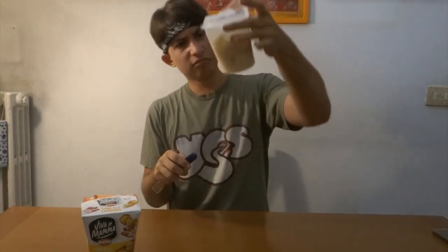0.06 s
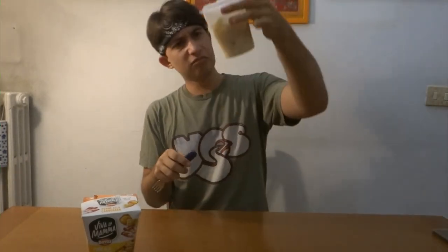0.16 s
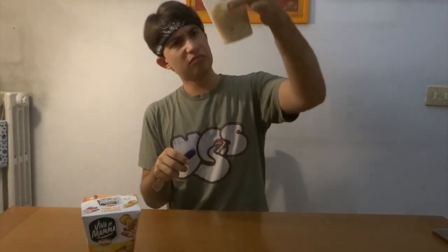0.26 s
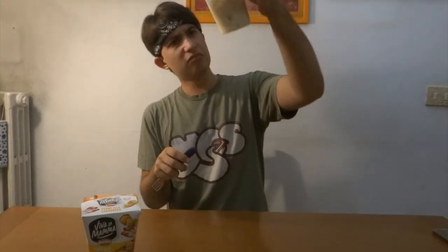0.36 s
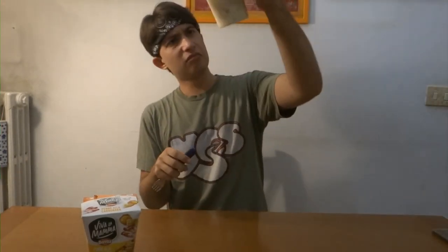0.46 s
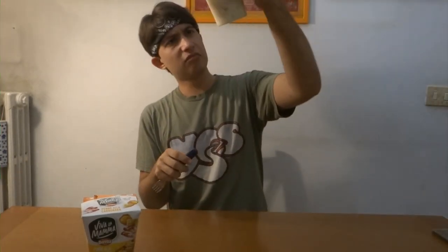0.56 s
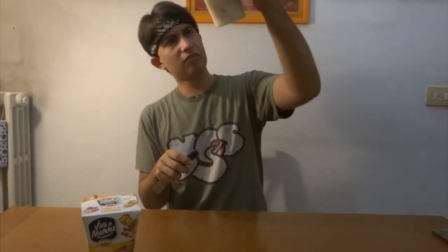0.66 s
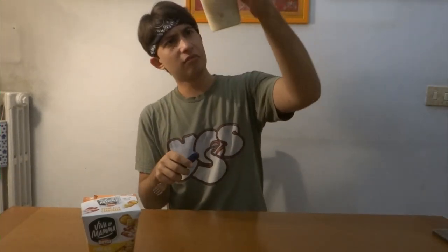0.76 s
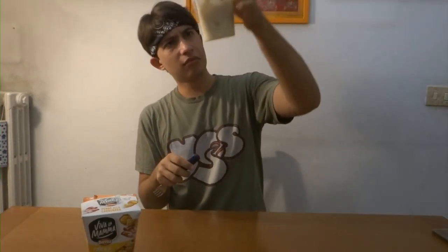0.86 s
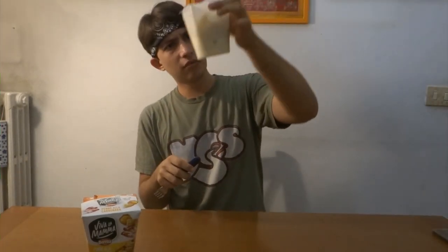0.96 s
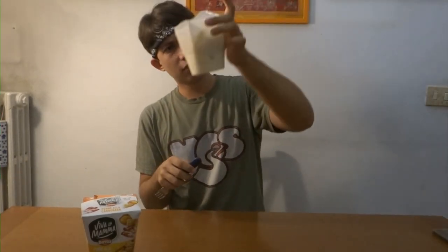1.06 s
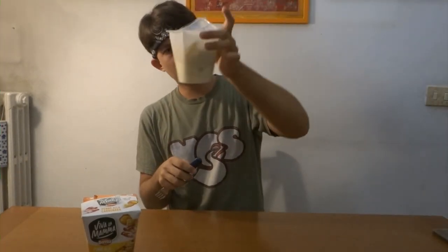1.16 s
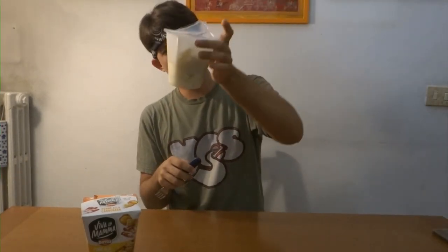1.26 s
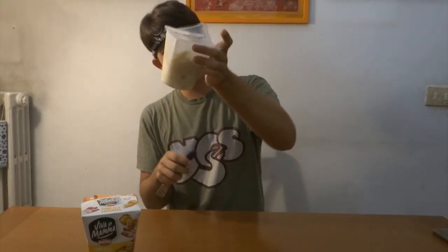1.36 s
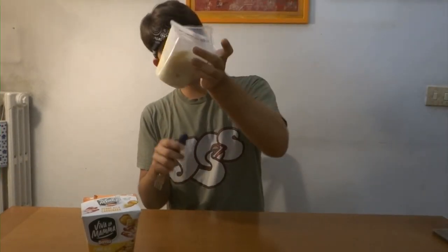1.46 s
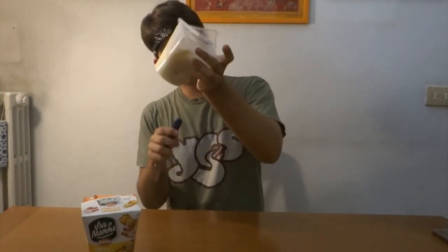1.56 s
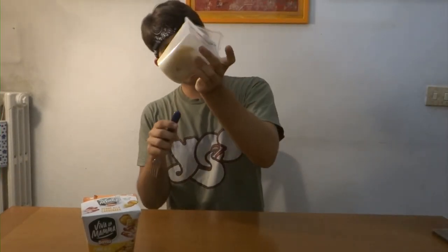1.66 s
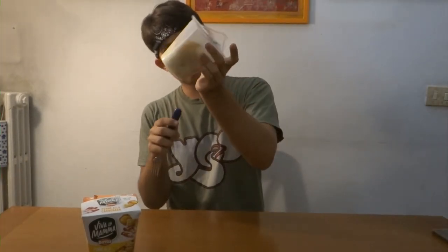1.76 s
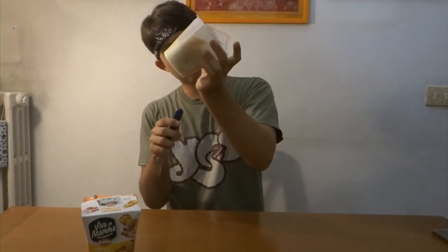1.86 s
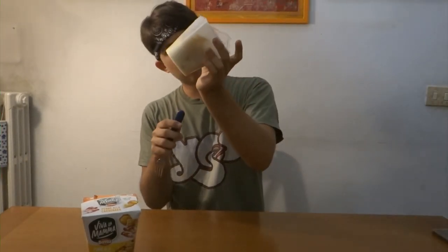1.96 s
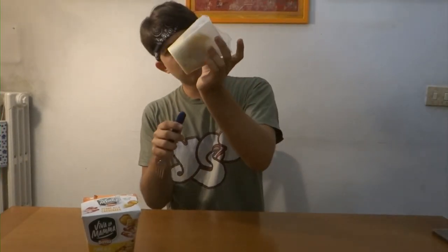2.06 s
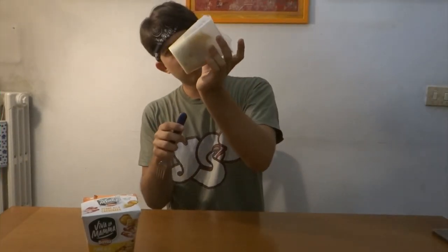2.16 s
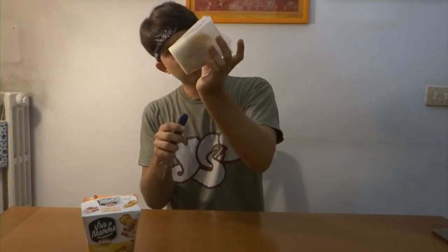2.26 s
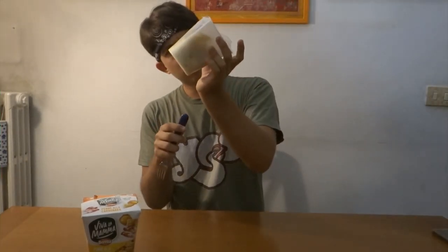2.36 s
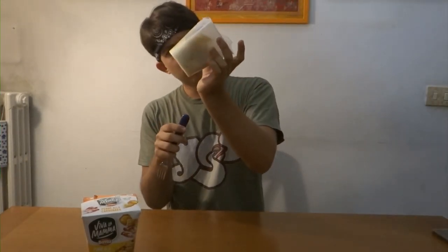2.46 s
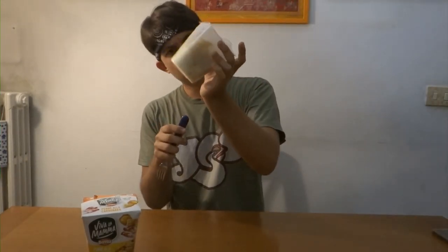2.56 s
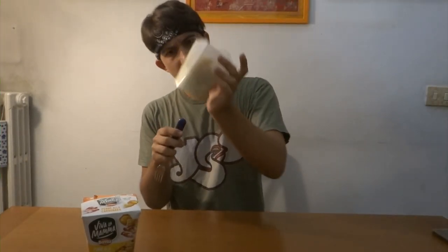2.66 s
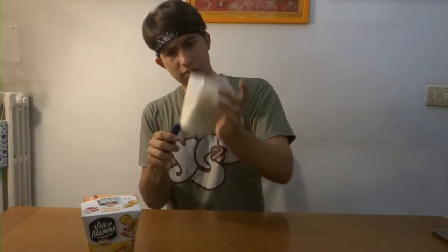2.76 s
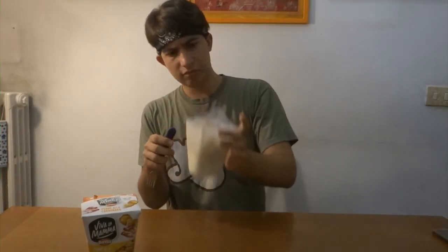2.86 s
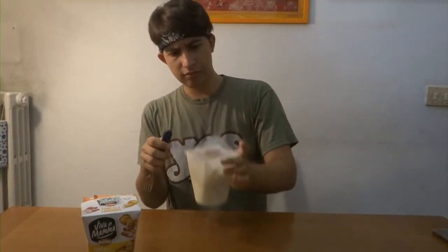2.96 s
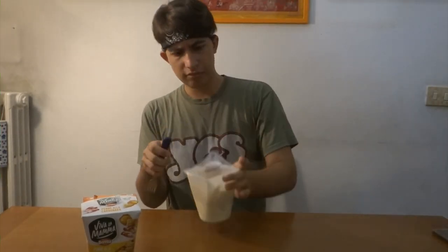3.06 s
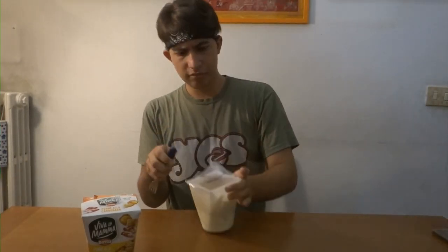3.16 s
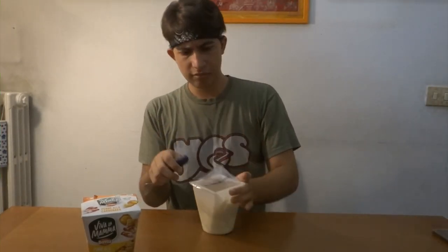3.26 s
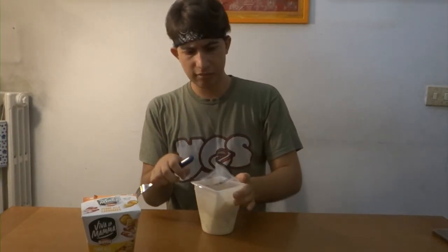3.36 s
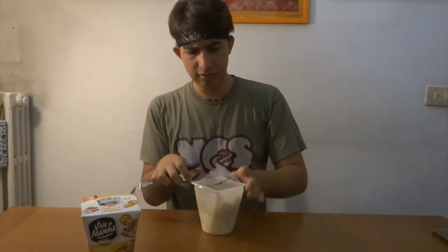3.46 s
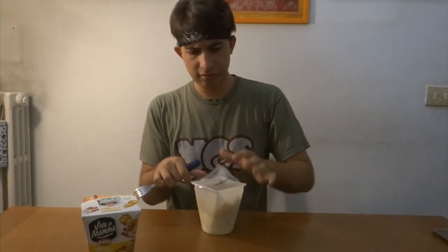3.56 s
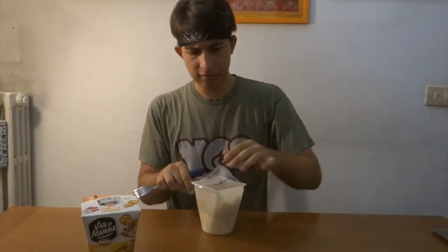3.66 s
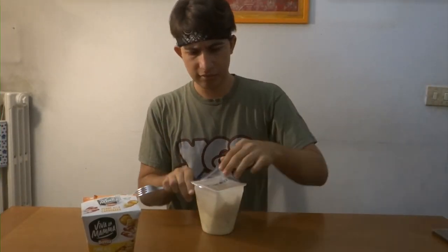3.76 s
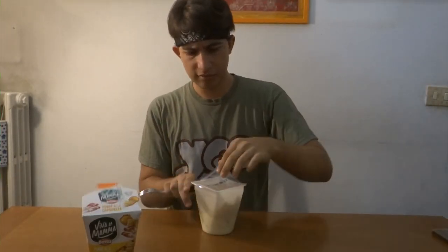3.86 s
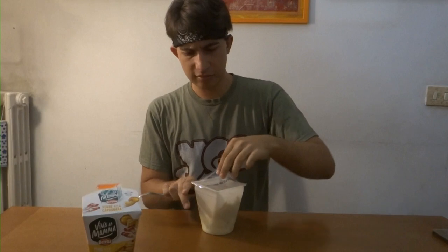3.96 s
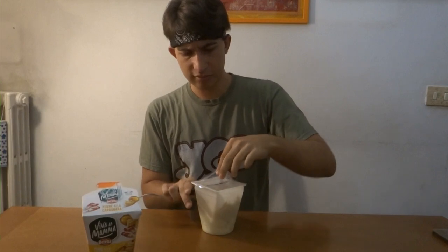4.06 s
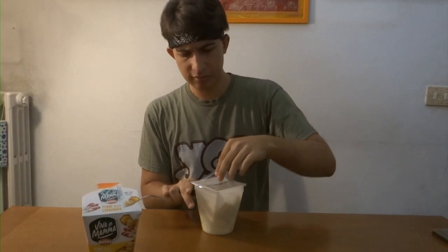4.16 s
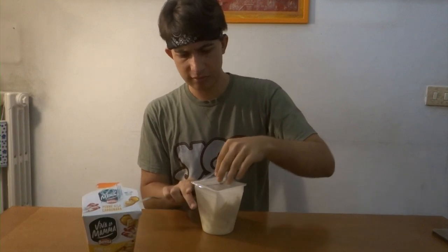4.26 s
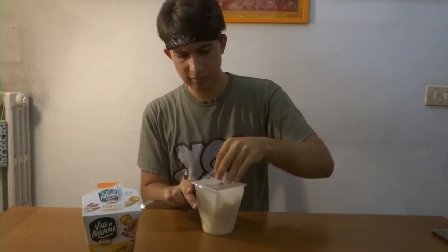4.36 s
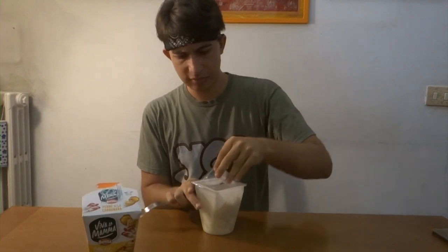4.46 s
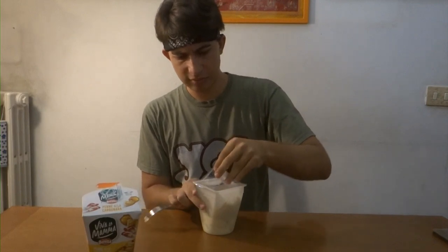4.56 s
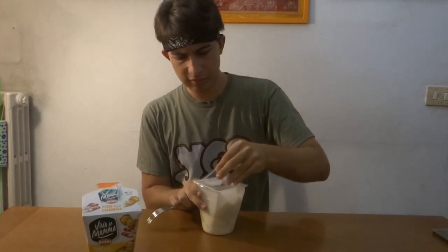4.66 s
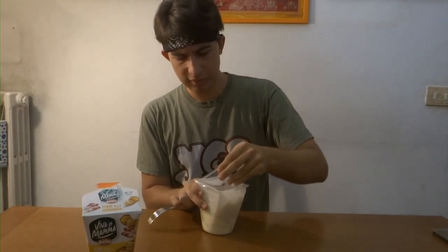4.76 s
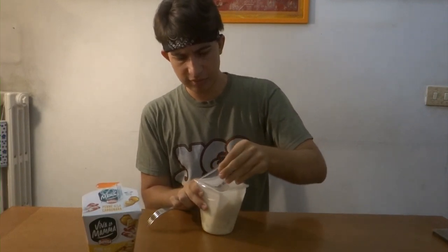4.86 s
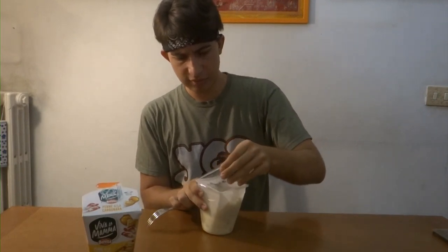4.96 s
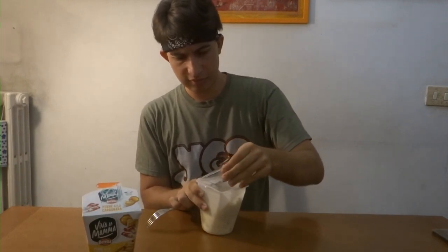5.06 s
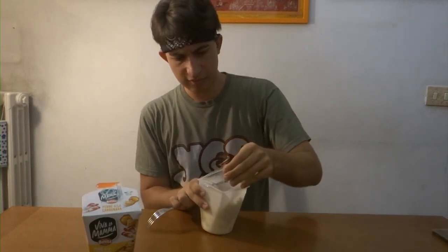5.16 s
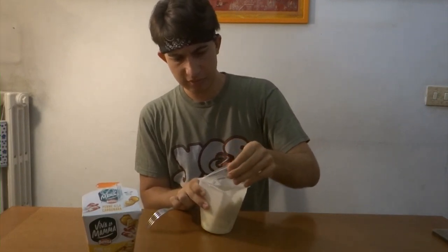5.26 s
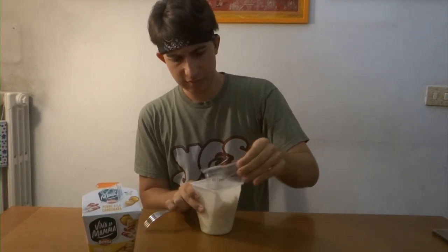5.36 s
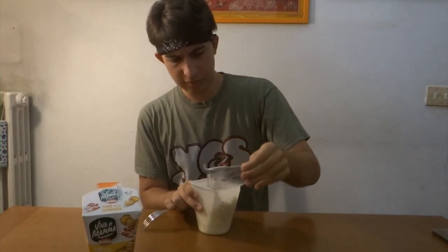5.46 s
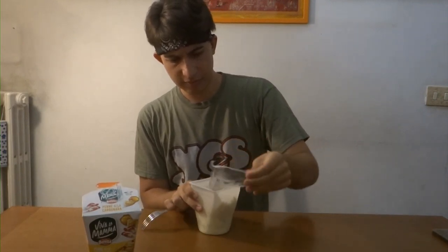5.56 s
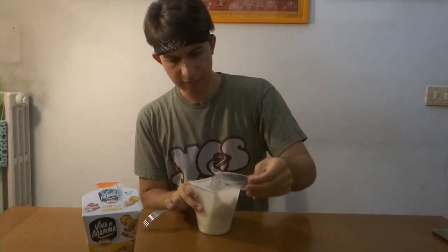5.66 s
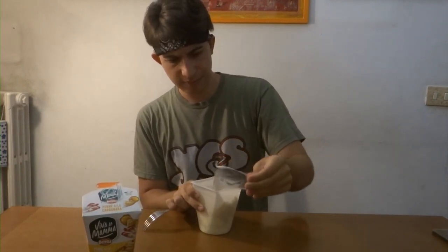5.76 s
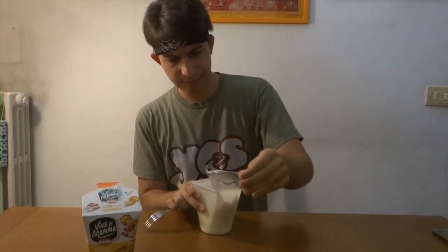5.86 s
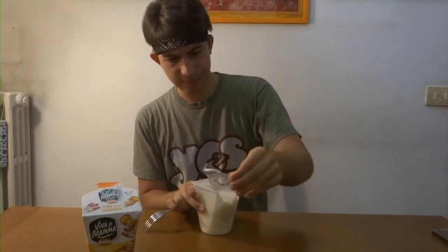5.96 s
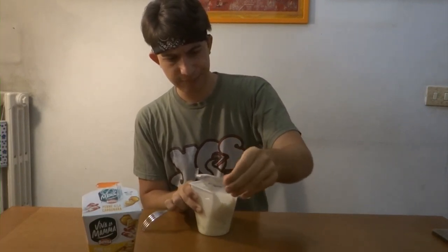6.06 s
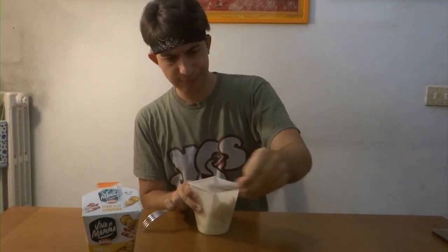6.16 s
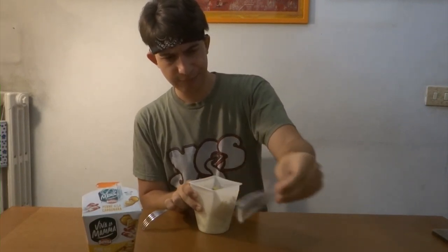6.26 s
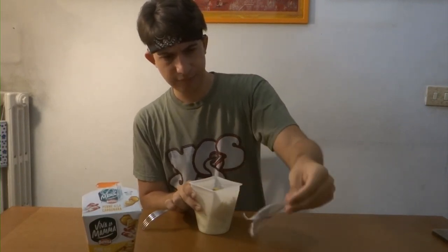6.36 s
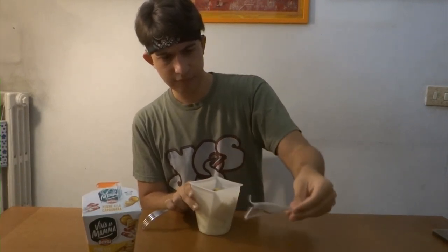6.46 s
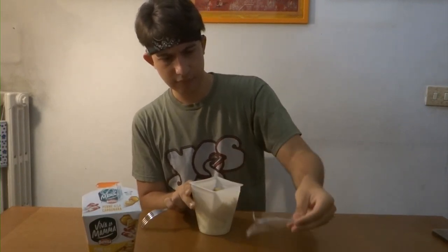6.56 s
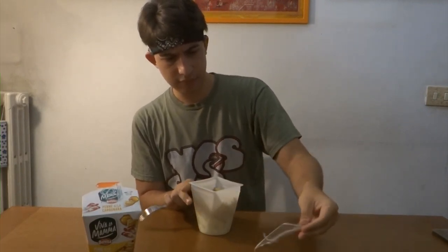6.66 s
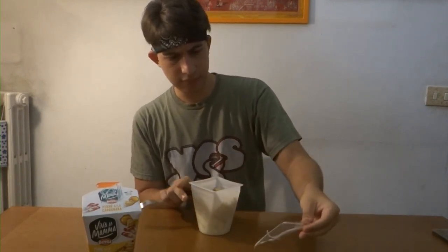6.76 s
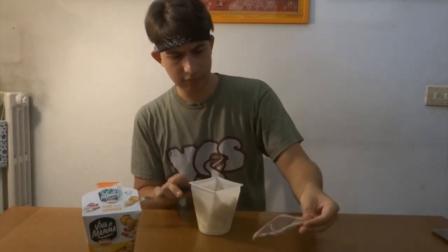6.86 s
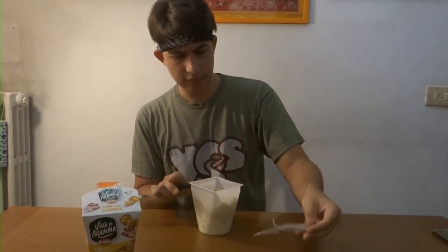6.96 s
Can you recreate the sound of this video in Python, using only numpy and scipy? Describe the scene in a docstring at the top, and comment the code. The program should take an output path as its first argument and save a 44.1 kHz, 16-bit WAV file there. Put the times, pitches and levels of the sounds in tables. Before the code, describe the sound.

Fingers brush and tap a plastic cup, it thumps onto a wooden table, then its film lid is picked and peeled off with loud, sharp crackles.

```python
"""Fingers brush and tap a plastic food cup as it is turned, over a low hum in a small bare room.
The cup is set down on a wooden table, then its film lid is picked at, peeled off and laid aside.
The seal lets go in streams of tiny random fractures; the film buckles in sharp, short noise bursts.
Both ring the cup wall and the fractures drum the taut lid, each through a filter of its own colour.
Sliding skin is finer grain noise, the landing a set of decaying sines; echoes and a tail add the room."""
import sys
import numpy as np
from scipy import signal
from scipy.fft import rfft, irfft
from scipy.io import wavfile
from scipy.ndimage import uniform_filter1d

SR = 44100
rng = np.random.default_rng(int(sys.argv[2]) if len(sys.argv) > 2 else 0)


def log_audio(samples):
    """Write samples as a 16-bit WAV file to the path given in sys.argv[1]."""
    # one column per channel
    frames = np.atleast_2d(samples).T
    # limit to full scale, then quantise
    limited = np.clip(frames, -1, 1)
    pcm = np.round(limited * 32767).astype(np.int16)
    wavfile.write(sys.argv[1], SR, pcm)


N = 308712
TIME = np.arange(N) / SR

# resonance of the cup wall: (frequency [Hz], relative gain [dB])
CUP_WALL_COLOUR = [(60, -35), (250, -14.5), (560, -5.5), (720, 2), (830, 8), (1000, 0.5), (1250, -2),
                   (1600, -16.5), (3000, -63)]
# drumming of the taut lid: (frequency [Hz], relative gain [dB])
LID_COLOUR = [(60, -60), (150, -11), (210, -10), (270, 0), (350, 3), (430, 2), (560, -7), (800, -31),
              (2000, -42)]
# midrange of skin and cloth rubbing: (frequency [Hz], relative gain [dB])
RUB_MID_COLOUR = [(200, -41), (900, -2.5), (1500, 1.5), (2400, 2.5), (3500, -2.5), (4500, -7.5), (7000, -6),
                  (16000, -67)]
# hiss of skin and cloth rubbing: (frequency [Hz], relative gain [dB])
RUB_HISS_COLOUR = [(1500, -21), (4300, 0.5), (5500, -4.5), (7500, -3), (9300, -0.5), (11000, -10.5),
                   (13000, -22), (15500, -17)]
# the hand keeps the film taut between pulls: (from [s], to [s])
TAUT_SPAN = (3.9, 6.1)
# a fingernail works at the corner and scratches the rim: (from [s], to [s])
PICKING_SPAN = (4.1, 5.15)


def peel(attack_share=0.33, release_s=0.012, taut_crackle_db=-55, taut_bright_db=3, taut_lid_db=-58.5,
         picking_db=-49.5, uneven_db=3, slip_rate_hz=22, wall_spread_db=4.0):
    """The seal gives way in a stream of fractures that tug at the film, the cup wall and the taut lid."""
    # each pull tears a stretch of the seal: (start [s], length [s], crackle level [dB],
    # treble over midrange [dB], cup wall level [dB], lid drumming level [dB])
    pulls = [(3.832, 0.051, -45, 15, -56, -46), (3.918, 0.036, -49.5, 11, -40, -57),
             (4.099, 0.033, -45.5, -21, -41.5, -63), (4.218, 0.058, -42.5, -6, -45, -69),
             (4.595, 0.044, -39.5, 10, -43.5, -71), (4.68, 0.061, -50.5, 3, -50, -51),
             (4.825, 0.039, -31, 40, -38, -40.5), (4.928, 0.051, -32, -3, -37, -40.5),
             (4.972, 0.049, -33, 9, -34.5, -45.5), (5.085, 0.12, -37, 5, -48, -49.5),
             (5.277, 0.058, -32, 7, -32, -34.5), (5.308, 0.061, -25.5, 6, -31, -28.5),
             (5.36, .055, -21, 1, -29.5, -36.5), (5.746, 0.032, -28.5, 6.5, -48, -41.5),
             (5.779, 0.046, -29.5, 8.5, -40, -36), (6.106, 0.037, -38, -7, -55, -42),
             (6.18, .04, -33.5, 11, -42.5, -42)]
    start, length, level, bright, wall, lid = np.transpose(pulls)
    db, treble_db, wall_db, lid_db = gestures(
        start, length, attack_share, release_s, level, level + bright, wall, lid)
    film, fractures, density = crackle(db, treble_db - db)

    # between pulls the taut film creaks and drums faintly
    taut = during(TAUT_SPAN)
    creak = taut * crackle(taut_crackle_db, taut_bright_db, rate=800, least_rate=120)[0]

    # the nail catches and slips on the rim
    nail = undb(picking_db + uneven_db * walk(slip_rate_hz)) * during(PICKING_SPAN)

    # levels add by power
    wall_push = np.hypot(undb(wall_db), nail)
    lid_push = np.hypot(undb(lid_db), undb(taut_lid_db) * taut)
    cup = wall_push * ring(grains(2 * density, wall_spread_db, 0.024), response(CUP_WALL_COLOUR))
    drumming = lid_push * ring(fractures, response(LID_COLOUR))
    return film + creak + cup + drumming


def crackle(db, bright_db, rate=1400, rate_at_db=-37.5, crowding=0.55, least_rate=250,
            spread_db=3.5, evening=0.09):
    """Fractures flex the film and tick; returns their sound, the fractures and their number per second."""
    # film flexing: (frequency [Hz], relative gain [dB])
    flex_colour = [(200, -45), (800, -7), (1400, -6), (2100, -5), (2900, -5), (3600, -6.5), (4500, -5.5),
                   (7000, -23.5), (16000, -70)]
    # film ticking: (frequency [Hz], relative gain [dB])
    tick_colour = [(1000, -45), (2500, -10), (4300, -3), (5600, -1.5), (7200, 5.5), (9000, 4.5),
                   (10500, 1.5), (13000, -14), (15500, -9)]
    # picking gives sparse, uneven crackles, a hard pull a dense, even rip
    force_db = db - rate_at_db
    density = np.maximum(rate * undb(crowding * force_db), least_rate)
    fractures = grains(density, spread_db - evening * np.maximum(force_db, 0), 0.046)
    # each fracture flexes and ticks at once, but pushes either way
    ticks = fractures * rng.choice([-1, 1], N)
    flexing = ring(fractures, response(flex_colour))
    ticking = ring(ticks, response(tick_colour))
    return undb(db) * blend(flexing, ticking, bright_db), fractures, density


def snaps(decay_s=0.00053, kick=1.06, shiver=0.064, shiver_s=0.017, wall_db=-15, crease_scatter=0.06):
    """A crease flips through with a kick; the film flexes, ticks, shivers on and shakes the cup."""
    # the film buckles: (time [s], level [dB], treble over midrange [dB])
    buckles = [(3.4054, -10, -20), (3.9219, -4, -8.5), (4.2, -3, 10.5), (4.2727, -12, -14),
               (4.2963, -8, -12), (4.3677, -3, 5.5), (4.4895, -4.5, -8), (4.553, -5, 2.5),
               (4.6181, -1.5, 3), (4.6891, -7, -20), (4.722, -6, 7), (4.8024, -3.5, 1), (4.8272, 3.5, -10),
               (4.8346, -1, 9), (4.9366, -5, -4), (4.97, 3, 1), (4.9849, 5.5, 9), (5.0084, 4, 5),
               (5.02, 2, 4), (5.0632, 3, .5), (5.1143, -4.5, 4), (5.245, 1, 2), (5.2581, 9, -4),
               (5.2931, 5, 0), (5.315, 8.5, -11), (5.3374, 5.5, -12), (5.3645, 5, 2), (5.3771, 8.5, 2),
               (5.3886, 10, -7), (5.4645, 4.5, 1.5), (5.482, -9, 9), (5.5886, 3.5, 0.5), (5.6165, -4, 12),
               (5.6449, -0.5, 9), (5.661, -4, 8), (5.7109, -4.5, 13), (5.7286, -6.5, 8), (5.742, 1.5, 11),
               (5.7567, -5, 24), (5.7945, 3.5, 30), (5.9687, -6, 17), (5.982, -30, 28), (6.1058, -11, 10),
               (6.1153, .5, 2.5), (6.1263, -4, 7), (6.1696, -1, 18), (6.1772, 4, 5), (6.392, -12, 4),
               (6.6704, -22, -3)]
    # a hard snap ticks: (frequency [Hz], relative gain [dB])
    tick_colour = [(1000, -66), (2500, -25), (4300, -9), (5800, 2.5), (7200, -1), (9000, 5), (11000, -3.5),
                   (13000, -10.5), (15500, -13)]
    # a crease rings briefly, before its pitch is scattered: (frequency [Hz], relative gain [dB])
    flex_colour = [(200, -35), (800, -10), (1450, -19.5), (2100, -3), (2850, -1), (3500, -4), (4400, -11.5),
                   (5700, -5), (7200, -44), (16000, -57)]
    out, t = np.zeros(N), TIME[:SR // 100]
    tick, wall = response(tick_colour), response(CUP_WALL_COLOUR)
    envelope = np.exp(-t / decay_s) + shiver * np.exp(-t / shiver_s)
    for s, db, bright_db in buckles + small_snaps():
        pushes = kick * (t == 0) + rng.standard_normal((3, len(t))) * envelope
        # every crease has its own size, and so its own pitch
        pitch = np.exp(crease_scatter * rng.standard_normal())
        flex = response(np.array(flex_colour) * [pitch, 1])
        mid, treble, cup = (unit(signal.fftconvolve(p, r)) for p, r in zip(pushes, (flex, tick, wall)))
        add(out, s, undb(db) * (blend(mid, treble, bright_db) + undb(wall_db) * cup))
    return out


def small_snaps(count=30, db=-14, spread_db=2, bright_db=5, bright_spread_db=7):
    """Lesser creases give way at random: (time [s], level [dB], treble over midrange [dB])."""
    when, size, colour = rng.uniform(-1, 1, (count, 3)).T
    first, last = PICKING_SPAN[0], TAUT_SPAN[1]
    s = first + (when + 1) / 2 * (last - first)
    return list(zip(s, db + spread_db * size, bright_db + bright_spread_db * colour))


def film_release():
    """The last of the seal rips and the film flaps free in coloured, dying noise bursts."""
    # rips: (time [s], level [dB], decay [s])
    rips = [(6.131, -4, 0.0013), (6.1754, 5.5, 0.0054), (6.188, -2, 0.011)]
    # flapping film: (frequency [Hz], relative gain [dB])
    flap_colour = [(40, -10), (110, 8.5), (200, 9), (330, -1), (520, -10), (1000, 1), (1900, -1), (3800, 3),
                   (6500, 3), (10000, -0.5), (13000, -12), (15500, -8)]
    out = np.zeros(N)
    for s, db, decay_s in rips:
        add(out, s, undb(db) * burst(decay_s, flap_colour))
    return out


def lid_pops(decay_s=0.0034):
    """The taut lid pops as it slackens: short bursts through its drum resonance."""
    # pops: (time [s], level [dB])
    pops = [(5.361, 3), (5.385, 6), (5.408, -3), (5.764, -10), (5.804, -14), (6.116, -4)]
    out = np.zeros(N)
    for s, db in pops:
        add(out, s, undb(db) * burst(decay_s, LID_COLOUR))
    return out


def loose_film(attack_share=0.19, release_s=0.012):
    """The freed film crinkles on its own, with no cup or lid resonance."""
    # crinkles as it is laid aside: (start [s], length [s], level [dB], treble over midrange [dB])
    crinkles = [(6.326, 0.042, -46, -6), (6.367, 0.058, -42, 4), (6.44, 0.089, -48, -6),
                (6.492, 0.056, -46, 6), (6.513, 0.4, -56, 1), (6.812, 0.013, -48.5, 8)]
    start, length, level, bright = np.transpose(crinkles)
    db, treble_db = gestures(start, length, attack_share, release_s, level, level + bright)
    return crackle(db, treble_db - db, rate=2300)[0]


def landing(slap_db=-4, slap_s=0.0042):
    """The cup lands and rocks flat: cup and table top ring as decaying sines under a slap of the base."""
    # contacts: (time [s], level [dB])
    contacts = [(3.2477, 3), (3.27, -19), (3.292, -7.5)]
    # modes of cup and table top: (frequency [Hz], relative level [dB], decay by 60 dB [s])
    modes = [(59, -15, 0.3), (97.6, -18, 0.28), (157, -12, 0.18), (210, 3, 0.075), (308, 1, 0.027),
             (385, 2.5, 0.028), (454, -4, 0.034), (594, 2.5, 0.014), (820, 4, 0.025), (878, -2.5, 0.081),
             (1010, -2.5, 0.023), (1534, -8, 0.026), (1920, -8, 0.028), (2500, -7, 0.011)]
    # slap of the cup base: (frequency [Hz], relative gain [dB])
    base_colour = [(100, -4), (500, -1), (1000, -2.5), (1900, -10), (2900, -10), (4000, -20), (7000, -32),
                   (15000, -42)]
    out, t = np.zeros(N), TIME[:SR // 4]
    thud = np.zeros(len(t))
    for k, (hz, db, t60) in enumerate(modes):
        thud += (-1) ** k * undb(db - 60 * t / t60) * np.sin(2 * np.pi * hz * t)
    thud = unit(thud)
    for s, db in contacts:
        add(out, s, undb(db) * thud)
        add(out, s, undb(db + slap_db) * burst(slap_s, base_colour))
    return out


def finger_taps(decay_s=0.0037):
    """Fingers tap the cup wall: short bursts through its resonance."""
    # taps: (time [s], level [dB])
    taps = [(0.202, -12), (.377, -15.5), (0.799, -19.5), (3.406, -10.5), (3.922, -10.5), (4.69, -6),
            (4.827, -11)]
    out = np.zeros(N)
    for s, db in taps:
        add(out, s, undb(db) * burst(decay_s, CUP_WALL_COLOUR))
    return out


def rub(rate=7000, spread_db=3.0, attack_share=0.17, release_s=0.024):
    """Skin and cloth catch and slip very finely; the hollow of the cup colours it."""
    # fingers and sleeve slide as the cup is handled: (start [s], length [s], level [dB],
    # treble over midrange [dB], hollow of the cup level [dB])
    strokes = [(-.02, 0.067, -36.5, -1.5, -35.5), (0.058, .18, -38.5, -6, -45),
               (0.242, 0.075, -45, -1, -53.5), (0.34, 0.13, -42.5, -3, -59), (0.46, 0.19, -49.5, 3.5, -63),
               (0.662, 0.13, -49, 0, -67), (0.954, 0.34, -50.5, 0, -61), (1.241, 0.034, -37.5, 4.5, -49),
               (1.297, .12, -48, 2.5, -58.5), (1.46, 0.062, -54.5, 8, -73), (2.877, .17, -51, 12, -73),
               (2.948, 0.18, -41, -3.5, -56), (3.131, 0.053, -37.5, -2, -54), (3.21, 0.087, -43, 1, -50),
               (3.324, 0.19, -50, 12, -52.5), (3.483, 0.21, -59.5, 2, -67), (3.757, 0.12, -54.5, 7, -64)]
    # hollow of the cup: (frequency [Hz], relative gain [dB])
    hollow_colour = [(150, -9), (330, 1), (470, 5.5), (560, 10), (700, 1), (950, 7), (1300, -7.5),
                     (2200, -6), (5000, -32.5)]
    start, length, level, bright, cup = np.transpose(strokes)
    db, treble_db, cup_db = gestures(start, length, attack_share, release_s, level, level + bright, cup)
    colours = (RUB_MID_COLOUR, RUB_HISS_COLOUR, hollow_colour)
    mid, hiss, hollow = (ring(grains(rate, spread_db, 0.02), response(c)) for c in colours)
    return undb(db) * blend(mid, hiss, treble_db - db) + undb(cup_db) * hollow


def finger_brushes():
    """Quick brushes of fingers over the cup: dying noise with the colours of rubbing."""
    # brushes: (time [s], level [dB], decay [s], treble over midrange [dB])
    brushes = [(.2, -4, 0.04, -3), (.373, -2.5, 0.024, -3), (0.693, -10.5, 0.019, -4),
               (1.024, -19, 0.0089, 1), (1.134, -15, 0.017, 9), (1.245, -14.5, 0.06, -3),
               (3.141, -6, 0.012, -12), (3.362, -12.5, 0.015, 14)]
    out = np.zeros(N)
    for s, db, decay_s, bright_db in brushes:
        mid, hiss = burst(decay_s, RUB_MID_COLOUR), burst(decay_s, RUB_HISS_COLOUR)
        add(out, s, undb(db) * blend(mid, hiss, bright_db))
    return out


def room(sound, direct_db, room_db, turn_rate_hz=18, turn_rad=1.63):
    """Direct sound and shifting reflections, alike in both channels but for a diffuse part."""
    # colour of the stereo difference in the diffuse sound, near mono in the bass and at the top:
    # (frequency [Hz], gain [dB])
    side_colour = [(100, -25), (300, -33), (800, -13), (2500, -13), (6000, -17), (9500, -11),
                   (11500, -11.5), (13500, -38)]
    # the source moves, so the mix of two reflection sets keeps changing
    angle = turn_rad * walk(turn_rate_hz)
    sent = undb(room_db) * sound
    reflected = ring(sent * np.cos(angle), reflections()) + ring(sent * np.sin(angle), reflections())
    side = tint(ring(sound, room_tail(TIME[:SR])), side_colour)
    return undb(direct_db) * sound + reflected + np.outer([1, -1], side)


def reflections(tail_db=-1.64, smear_s=0.0012):
    """Scattered early echoes and the tail, from one spot in the room."""
    # echoes off ceiling and walls: (delay [s], level [dB])
    echoes = [(0.0128, -8), (.015, -12.5), (0.019, -15.5), (0.028, -25)]
    t = TIME[:SR]
    paths = undb(tail_db) * room_tail(t)
    for s, db in echoes:
        scatter = rng.standard_normal(SR // 100) * np.exp(-t[:SR // 100] / smear_s)
        add(paths, s, undb(db) * unit(scatter))
    return paths


def room_tail(t, onset_s=0.01):
    """Diffuse reverberation of unit energy; the treble dies first."""
    # reverberation: (frequency [Hz], decay by 60 dB [s])
    decay_times = [(150, 0.72), (700, 0.57), (3000, 0.53), (8000, 0.42), (15000, 0.3)]
    noise, hz = rfft(rng.standard_normal(len(t))), np.fft.rfftfreq(len(t), 1 / SR)
    edges_hz = [0, 300, 1200, 4000, 7000, 11000, SR]
    tail = np.zeros(len(t))
    for low, high in zip(edges_hz, edges_hz[1:]):
        band = irfft(noise * ((hz >= low) & (hz < high)), len(t))
        tail += band * undb(-60 * t / on_log_axis(decay_times, (low + high) / 2))
    return unit(tail * (t > onset_s))


def room_air(level_db=-48.5):
    """Steady room air: coloured noise, with a second noise in opposite sign on the two channels."""
    # room air: (frequency [Hz], relative gain [dB])
    air_colour = [(20, -23.5), (45, -1), (75, -30), (130, 2.5), (200, -2.5), (300, -8), (450, -11),
                  (800, -16), (1050, -18.5), (1400, -25.5), (3400, -25), (6000, -32.5), (9500, -29),
                  (13000, -37), (15500, -37.5)]
    # stereo difference of the air: (frequency [Hz], gain [dB])
    air_difference = [(60, -8), (110, -18.5), (200, -10.5), (380, -3), (700, -1), (1290, 1.5), (2380, -1),
                      (4400, -4.5), (8120, -8.5), (15000, -22)]
    air, side = (ring(rng.standard_normal(N), response(air_colour)) for _ in range(2))
    return undb(level_db) * (air + np.outer([1, -1], tint(side, air_difference)))


def rumble_level():
    """Level of the low rumble over time in dB, joined by straight lines."""
    # low rumble as the cup is handled, swelling and sinking: (time [s], level [dB])
    levels = [(0, -55), (.5, -49), (.66, -57), (1.1, -52), (1.4, -45), (1.9, -53), (2.8, -57.5), (4, -56),
              (7, -58)]
    s, db = np.transpose(levels)
    return np.interp(TIME, s, db)


def low_rumble():
    """Low rumble as the cup is handled: noise with a bass colour that swells and sinks."""
    # rumble: (frequency [Hz], relative gain [dB])
    rumble_colour = [(20, -38), (50, 6), (75, -7.5), (105, -15.5), (160, -3), (250, -13.5), (1000, -50)]
    return undb(rumble_level()) * ring(rng.standard_normal(N), response(rumble_colour))


def wavering_hum(waver_db=3.0, drift_hz=2.17, follow=0.76):
    """Low sines that waver in level and pitch and swell with the rumble."""
    # hum, before wavering: (frequency [Hz], level [dB])
    tones = [(54, -55.5), (96.4, -50.5)]
    rumble_db = rumble_level()
    swell_db = follow * (rumble_db - rumble_db.mean())
    out = np.zeros(N)
    for hz, db in tones:
        gain = undb(db + swell_db + waver_db * walk(7))
        phase = 2 * np.pi * np.cumsum(hz + drift_hz * walk(8.3)) / SR
        out += gain * np.sin(phase)
    return out


def undb(db):
    """Decibels to gain."""
    return 10 ** (np.asarray(db) / 20)


def unit(x):
    """Scale to an energy of 1."""
    return x / np.sqrt(np.sum(x ** 2))


def on_log_axis(points, hz):
    """Read (Hz, value) points at any frequency."""
    f, value = np.transpose(points)
    return np.interp(np.log(np.maximum(hz, 1)), np.log(f), value)


def ring(x, impulse_response):
    """Pass a sound through an impulse response."""
    return signal.oaconvolve(x, impulse_response)[:N]


def response(points, size=4096):
    """Causal impulse response of unit energy with the given colour."""
    # folding the cepstrum forward in time gives minimum phase
    gain = undb(on_log_axis(points, np.fft.rfftfreq(size, 1 / SR)))
    cepstrum = irfft(np.log(gain))
    cepstrum[1:size // 2] *= 2
    cepstrum[size // 2 + 1:] = 0
    return unit(irfft(np.exp(rfft(cepstrum))))


def tint(x, points):
    """Apply a (Hz, dB) gain curve."""
    gain = undb(on_log_axis(points, np.fft.rfftfreq(len(x), 1 / SR)))
    return irfft(rfft(x) * gain, len(x))


def add(track, s, sound):
    """Mix a short sound in at a time in seconds."""
    start = int(np.clip(s * SR, 0, N - 1))
    track[start:start + len(sound)] += sound[:N - start]


def walk(rate_hz):
    """Slow chance: random levels held for 1 / rate_hz seconds and smoothed twice, with a spread of 1."""
    k = max(int(SR / rate_hz), 1)
    held = np.repeat(rng.standard_normal(N // k + 1), k)
    slewed = uniform_filter1d(uniform_filter1d(held, k), k)[:N]
    return slewed / slewed.std()


def grains(rate, spread_db, steady_s):
    """Random tiny impulses (rate per second), many small and a few large, at a running rms near 1."""
    size = undb(spread_db * np.minimum(rng.exponential(size=N), 4))
    clicks = (rng.random(N) < rate / SR) * size * rng.choice([-1, 1], N)
    power = np.abs(uniform_filter1d(clicks ** 2, int(steady_s * SR)))
    return clicks / np.sqrt(power + 1e-6)


def burst(decay_s, points):
    """Dying noise with a colour, of unit energy."""
    t = TIME[:SR // 16]
    return unit(signal.fftconvolve(rng.standard_normal(len(t)) * np.exp(-t / decay_s), response(points)))


def blend(mid, treble, bright_db):
    """Share the energy between a midrange and a treble part."""
    ratio = undb(bright_db)
    return (mid + ratio * treble) / np.sqrt(1 + ratio ** 2)


def during(span, fade_s=0.02):
    """1 inside a span of time, fading at its ends."""
    return np.clip(np.minimum(TIME - span[0], span[1] - TIME) / fade_s + 0.5, 0, 1)


def gestures(start, length, attack_share, release_s, *levels_db):
    """Hand movements swell in (long ones slowly), hold and die away; powers add to a dB curve per level."""
    t = TIME[::64]
    age, length = t - start[:, None], length[:, None]
    rise = 0.5 + 0.5 * np.tanh(2 * age / (attack_share * length) - 1)
    shapes = rise * np.exp(-np.maximum(age - length, 0) / release_s)
    powers = [undb(db) ** 2 @ shapes ** 2 for db in levels_db]
    return [np.interp(TIME, t, 10 * np.log10(power + 1e-12)) for power in powers]


def scene():
    """Film, cup and hands each reach the microphone by their own paths through the room."""
    tearing = room(peel() + loose_film(), direct_db=0.5, room_db=-0.14)
    snapping = room(snaps(), direct_db=0.0, room_db=-0.13)
    knocks = finger_taps() + lid_pops() + film_release() + landing()
    knocking = room(knocks, direct_db=2.0, room_db=0.0)
    rubbing = room(rub() + finger_brushes(), direct_db=0, room_db=-1.5)
    background = room_air() + low_rumble() + wavering_hum()
    return tearing + snapping + knocking + rubbing + background


def record(dry):
    """The input clips at full scale, then a steep lowpass cuts the top above 16.1 kHz."""
    lowpass = signal.ellip(10, 0.2, 80, 16100, fs=SR, output="sos")
    return signal.sosfilt(lowpass, np.clip(dry, -1, 1))


dry = scene()
out = record(dry)
log_audio(out)
```